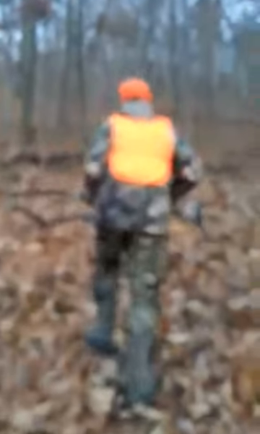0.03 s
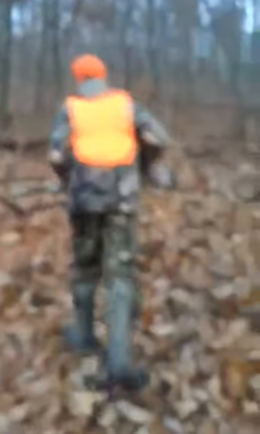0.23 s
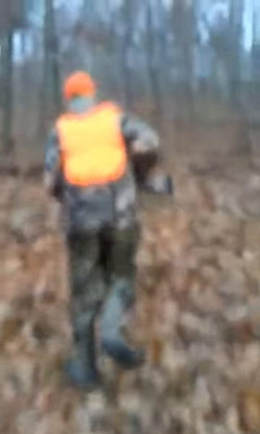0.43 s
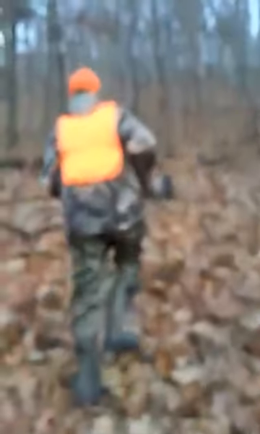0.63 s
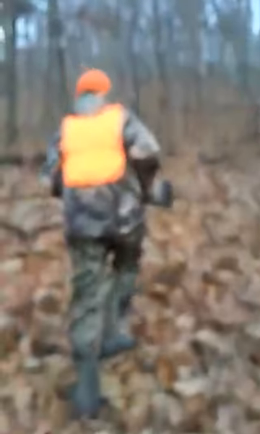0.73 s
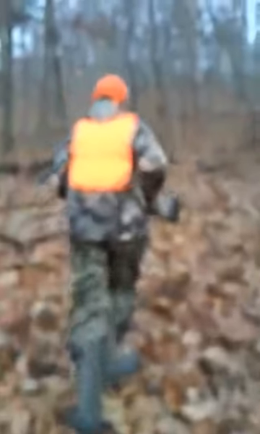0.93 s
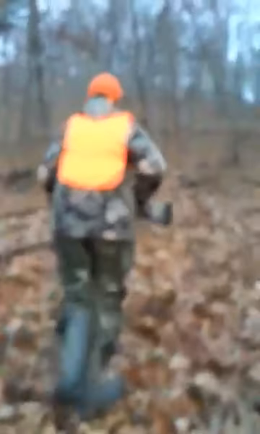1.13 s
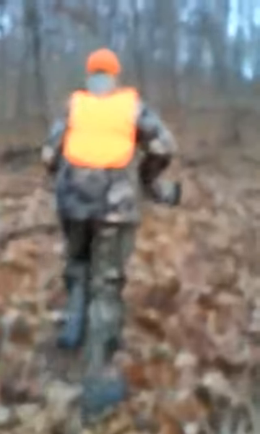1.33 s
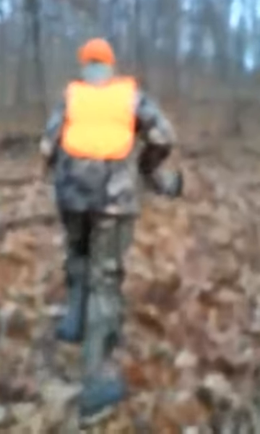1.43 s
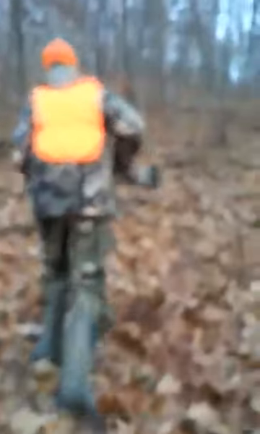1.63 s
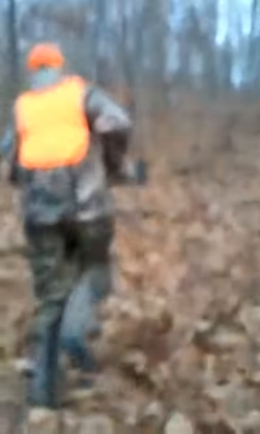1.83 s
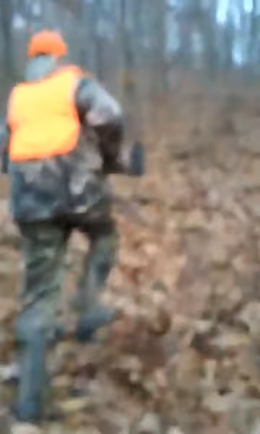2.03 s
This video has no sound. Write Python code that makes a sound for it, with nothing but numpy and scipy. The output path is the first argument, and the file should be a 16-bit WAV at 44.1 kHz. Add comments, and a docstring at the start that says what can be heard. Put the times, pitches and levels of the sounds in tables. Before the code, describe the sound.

Footsteps crunch through dry fallen leaves in the woods, with twigs snapping and light wind buffeting

```python
"""Two walkers climb through dry leaves, one a few steps ahead, one carrying the single microphone.
From the start, crushed litter crackles as damped grains and loose leaves swish as finer, brighter ones, swelling
most near 0.5, 1.2 and 1.8 s; filtered noise gives the wind and the far rustle. Twigs soon snap, as noisy cracks
with damped partials; wind puffs follow as windowed cosines, then soil thumps as damped sines. The wind is
strongest near 1.9 s. Patches of the treble are replaced with noise unrelated left and right."""
import sys
import numpy as np
from scipy import signal
from scipy.fft import rfft, irfft, next_fast_len
from scipy.io import wavfile
from scipy.ndimage import uniform_filter1d, map_coordinates

SR = 44100
rng = np.random.default_rng(int(sys.argv[2]) if len(sys.argv) > 2 else 0)


def dump_mix(stems):
    """Bounce the given channels to the path in sys.argv[1] as a 16-bit WAV at rate SR."""
    frames = np.atleast_2d(stems).T  # one column per channel
    limited = np.clip(frames, -1, 1)  # hard clip at full scale
    pcm = np.round(limited * 32767).astype(np.int16)
    wavfile.write(sys.argv[1], SR, pcm)


def ratio_of_db(decibels):
    """Turn decibels (scalar or array-like) into linear amplitude factors; 0 dB maps to 1."""
    return 10 ** (np.asarray(decibels, float) / 20)


N = 91110

# Weight on the litter, as an envelope before fixed trims and wobble:
# time_s [s], level_db [dB], packed_layer_over_level_db [dB]
CRUNCH_ENVELOPE = [(0.0, -39.5, -7), (0.046, -38.5, -22), (0.076, -48.5, -1), (0.12, -49, -19),
                   (0.2, -52, -12), (0.25, -45, -23), (0.292, -48, -25), (0.306, -35, -10),
                   (0.342, -32, -7), (0.404, -37, -7.5), (0.46, -32.5, -6.5), (0.496, -22.5, -11),
                   (0.51, -19, -10), (0.528, -23.5, -7), (0.568, -21, -15), (0.584, -30.5, -7),
                   (0.614, -27, -11), (0.626, -35, -7), (0.7, -41.5, -3), (0.74, -45.5, 3.5),
                   (0.846, -49.5, -1), (0.868, -43.5, -3), (0.896, -51, 3), (0.935, -47, 0),
                   (0.975, -38.5, -1), (1.0, -40.5, -4), (1.038, -34.5, -7.5), (1.088, -42, -1),
                   (1.104, -26, -2.5), (1.119, -27.5, -2), (1.122, -18.5, -6), (1.162, -15.5, -10.5),
                   (1.186, -20.5, -3.5), (1.195, -24, -12), (1.203, -24, -5), (1.226, -28, -7),
                   (1.26, -23.5, -9), (1.305, -32.5, -4.5), (1.335, -32, -9), (1.399, -39, -6.5),
                   (1.499, -52, 0), (1.505, -45.5, -5.5), (1.615, -44.5, -5), (1.633, -31, -8.5),
                   (1.691, -45.5, -5), (1.717, -39.5, -7), (1.745, -25.5, -18), (1.765, -32, -5),
                   (1.784, -21.5, -11), (1.833, -20, -12), (1.88, -25.5, -12.5), (1.9, -36, 0),
                   (1.922, -30.5, -8), (1.946, -40.5, -6), (1.989, -45, -6.5), (2.066, -48.5, -2.5)]
# Boots sweeping loose leaves, as an envelope before wobble: time_s [s], level_db [dB]
SWISH_ENVELOPE = [(0.0, -37.5), (0.116, -41.5), (0.22, -41.5), (0.292, -38), (0.306, -28.5), (0.35, -22.5),
                  (0.394, -33.5), (0.46, -30), (0.508, -22), (0.688, -37), (0.7, -62), (0.74, -42),
                  (0.846, -44), (0.858, -43), (0.868, -27.5), (0.88, -35), (0.906, -29.5), (0.92, -30.5),
                  (0.976, -24.5), (0.996, -33), (1.088, -35.5), (1.104, -29), (1.119, -27), (1.122, -21.5),
                  (1.238, -30), (1.258, -22.5), (1.305, -27), (1.365, -35.5), (1.421, -39.5), (1.597, -35),
                  (1.615, -27), (1.675, -29), (1.69, -40), (1.698, -29.5), (1.71, -30.5), (1.799, -21.5),
                  (1.883, -28.5), (2.033, -45), (2.049, -40), (2.066, -36)]
# Wind on the microphone, as an envelope before a fixed trim and wobble: time_s [s], level_db [dB]
WIND_ENVELOPE = [(0.0, -56.5), (0.37, -46), (0.42, -56), (0.48, -46), (0.95, -49.5), (0.99, -45),
                 (1.02, -48), (1.18, -31), (1.29, -52.5), (1.6, -35.5), (1.69, -45), (1.74, -37.5),
                 (1.88, -26), (1.95, -35), (2.0, -32), (2.07, -41)]
# Relative spectra of crushed leaves, packed layer, sliding leaves, wind and woods: frequency_hz [Hz], gain_db [dB]
CRUNCH_SPECTRUM = [(530, -40), (900, -13.5), (1980, -4), (3070, -5.5), (4260, -2), (8770, -12),
                   (12400, -12.5), (13300, -20)]
PACKED_SPECTRUM = [(110, -32), (220, -13), (324, -6.5), (498, -7.5), (1300, -4.5), (1690, -6), (2860, -120)]
SWISH_SPECTRUM = [(300, -17), (2350, -9), (3300, -24), (4600, -22), (5300, -5.5), (8850, -5), (10600, -9),
                  (11700, -4), (13300, -15)]
WIND_SPECTRUM = [(8.8, -41), (15, 2.5), (54, 0.5), (76, 0.5), (117, -3), (252, -17.5), (300, -39),
                 (390, -65), (660, -120)]
WOODS_SPECTRUM = [(59, -39), (100, -17), (196, -19), (340, 6), (1830, -20), (2810, -29), (13300, 2)]
# Single puffs of wind hitting the microphone: start_s [s], peak_db [dB], pitch_hz [Hz]
WIND_PUFFS = [(0.354, -39, 72), (0.984, -32, 55.5), (1.187, -30.5, 51.1), (1.467, -33.5, 67),
              (1.574, -31.5, 53.8), (1.737, -30.5, 60), (1.814, -29, 55.4), (1.86, -44, 61.5),
              (1.928, -18, 81.5), (1.963, -20.5, 67), (2.001, -29.5, 45)]
# Twigs and stiff leaves breaking:
# start_s [s], peak_db [dB], pitch_hz [Hz], decay_to_minus_60_db_s [s], ringing_over_crack_db [dB]
TWIG_SNAPS = [(0.04, -19, 4330, 0.021, 7), (0.134, -20.5, 4560, 0.015, 10), (0.215, -21, 1884, 0.019, 15),
              (0.427, -9.5, 8720, 0.011, -17), (0.508, -1.5, 2220, 0.013, -14), (0.556, -12, 975, 0.01, 17),
              (0.565, -20, 4360, 0.0099, -6), (0.711, -17, 4020, 0.061, -7.5), (0.721, -20, 4400, 0.026, 0),
              (1.028, -15, 2200, 0.0065, -2), (1.1221, -14.5, 1470, 0.012, -12),
              (1.138, -10, 4400, 0.025, 6), (1.159, -4, 2400, 0.016, -15), (1.198, -12, 1080, 0.021, 4),
              (1.254, -7, 4240, 0.011, 9), (1.278, -11.5, 1410, 0.0086, 11), (1.316, -2, 3520, 0.011, -20),
              (1.323, -6.5, 4370, 0.023, -8), (1.346, -21, 5100, 0.017, -9),
              (1.377, -11.5, 7160, 0.011, -4), (1.386, -14, 1605, 0.012, -1.5),
              (1.443, -22.5, 6900, 0.0076, 10), (1.574, -18.5, 7230, 0.007, 0),
              (1.697, -14.5, 7700, 0.023, -10)]
# Partials of a ringing twig, before random spread: pitch_ratio [times the pitch], level_db [dB]
TWIG_PARTIALS = [(1, 1), (1.48, -3.5), (1.95, -10.5), (3.03, -1.5)]
# Soles meeting the soil: start_s [s], level_before_damping_db [dB], pitch_hz [Hz]
SOIL_THUMPS = [(0.466, -22.5, 385), (0.476, -23.5, 194), (0.509, -6.5, 805), (0.519, -24.5, 200),
               (1.102, -13, 444), (1.202, -14.5, 336), (1.254, -18.5, 305), (1.47, -31, 230),
               (1.771, -22.5, 354), (1.935, -21.5, 165)]

WOODS_DB = -45
PUFF_CYCLES = 2  # length of a puff
SNAP_BUILD_S, SNAP_SPIKE = .0005, 6  # build-up time; instant of breaking, over the noise of the crack
THUMP_CYCLES = 7.2  # until 60 dB down
TOP_HZ = 13300  # band limit
PATCH_FROM_HZ, PATCH_BAND_HZ = 4400, 700  # lowest frequency and band width of the noise patches
PATCH_MOMENTS, PATCH_BANDS = .9, .66  # share of moments, and of bands within them
PATCH_JUMP_DB = 5  # a rise in power beyond this keeps the moment free of patches


def unit(x):
    """Normalization: the signal scaled to rms 1."""
    return x / np.sqrt(np.mean(x ** 2) + 1e-20)


def curve(rows, column=1):
    """Linear interpolation: one column against the time column, one value per sample."""
    table = np.transpose(rows)
    return np.interp(np.arange(N) / SR, table[0], table[column])


def wobble(rate_hz):
    """Random modulation: a smooth curve through Gaussian knots, rate_hz of them a second."""
    knots = rng.standard_normal(N // 50)
    return map_coordinates(knots, [np.arange(N) * rate_hz / SR])


def coloured(x, points):
    """Linear filtering: x through a spectrum of (Hz, dB) points on a log frequency axis, rms 1."""
    size = next_fast_len(N + 8192)
    hz, db = np.transpose(points)
    bins_hz = np.fft.rfftfreq(size, 1 / SR)
    gain = ratio_of_db(np.interp(np.log(bins_hz + 1), np.log(hz + 1), db))
    return unit(irfft(rfft(x, size) * gain, size)[:N])


def place(starts_s, rows):
    """Superposition: short sounds summed at their start times."""
    at = np.round(starts_s * SR).astype(int)[:, None] + np.arange(rows.shape[1])
    return np.bincount(at.ravel(), rows.ravel(), N + SR)[:N]


def crackle(count, low_hz, high_hz, cycles, spread_db, hiss):
    """Impulsive fracture: damped grains at random times, mostly small and a few large, over a share of hiss."""
    when, pitch, rarity = rng.random((3, count, 1))
    t = np.arange(int(3 * SR / low_hz)) / SR
    hz = low_hz + (high_hz - low_hz) * pitch
    size = ratio_of_db(-spread_db * np.log(rarity + 2e-3))
    # cycles: until the grain falls to 1/e
    rows = size * np.sqrt(hz) * np.exp(-t * hz / cycles) * np.sin(2 * np.pi * hz * t)
    grains = place(when[:, 0] * N / SR, rows)
    grains = unit(grains - grains.mean())
    # hiss is a share of the power
    return np.sqrt(1 - hiss) * grains + np.sqrt(hiss) * rng.standard_normal(N)


def crunch():
    """Brittle crushing: leaves crackle under the soles, the packed layer below in coarser, duller grains."""
    level_db = curve(CRUNCH_ENVELOPE) + 1.22 * wobble(70.95)
    leaves = crackle(count=14000, low_hz=600, high_hz=14000, cycles=.8, spread_db=2.5, hiss=.6)
    packed = crackle(count=1500, low_hz=130, high_hz=1500, cycles=.8, spread_db=2.2, hiss=.6)
    leaves_db = 1.15 * wobble(300) + 2.5
    packed_db = curve(CRUNCH_ENVELOPE, column=2) + 0.85 * wobble(47.3)
    upper = ratio_of_db(leaves_db) * coloured(leaves, CRUNCH_SPECTRUM)
    lower = ratio_of_db(packed_db) * coloured(packed, PACKED_SPECTRUM)
    return ratio_of_db(level_db) * (upper + lower)


def swish():
    """Sliding friction: loose leaves pass over each other in finer, brighter grains."""
    grains = crackle(count=14000, low_hz=3440, high_hz=13950, cycles=1.13, spread_db=2.5, hiss=0.43)
    level_db = curve(SWISH_ENVELOPE) + 1.68 * wobble(90)
    return ratio_of_db(level_db) * coloured(grains, SWISH_SPECTRUM)


def wind():
    """Pressure fluctuation: lumpy low noise buffets the microphone, with single rounded puffs."""
    start_s, peak_db, hz = np.transpose(WIND_PUFFS)[:, :, None]
    phase = np.minimum(np.arange(4000) / SR * hz / PUFF_CYCLES, 1)  # 0 to 1 through the puff
    swell = np.sin(np.pi * phase) ** 2
    wave = np.cos(2 * np.pi * PUFF_CYCLES * (phase - .5))
    puffs = place(start_s[:, 0], ratio_of_db(peak_db) * swell * wave)
    level_db = curve(WIND_ENVELOPE) + 1.15 * wobble(22.14) - 3.5
    return puffs + ratio_of_db(level_db) * coloured(rng.standard_normal(N), WIND_SPECTRUM)


def woods():
    """Diffuse background: far rustle and air among the trees as nearly steady filtered noise."""
    level_db = WOODS_DB + 0.39 * wobble(17.0)
    return ratio_of_db(level_db) * coloured(rng.standard_normal(N), WOODS_SPECTRUM)


def snaps():
    """Sudden release of strain: a noisy crack, broad around its pitch, and quickly damped partials."""
    start_s, peak_db, hz, t60_s, ring_db = np.transpose(TWIG_SNAPS)[:, :, None]
    t = np.arange(1024) / SR
    ring = 0
    for ratio, level_db in TWIG_PARTIALS:
        spread_db = 2 * rng.standard_normal(hz.shape)
        partial_hz = np.minimum(ratio * hz, 12500)
        ring = ring + ratio_of_db(level_db + spread_db) * np.sin(2 * np.pi * partial_hz * t)
    spike = np.round(t * SR) == round(SNAP_BUILD_S * SR)
    jolt = rng.standard_normal((len(hz), len(t))) - SNAP_SPIKE * spike
    relative = np.fft.rfftfreq(len(t), 1 / SR) / hz
    crack = irfft(rfft(jolt) * relative / (1 + relative ** 2.63), len(t))
    crack = crack / crack.std(1, keepdims=True)
    shape = ratio_of_db(-60 * t / t60_s) * (1 - np.exp(-(t / SNAP_BUILD_S) ** 2))
    rows = shape * (crack + ratio_of_db(ring_db) * ring)
    rows = rows / np.abs(rows).max(1, keepdims=True)
    return place(start_s[:, 0], ratio_of_db(peak_db) * rows)


def thumps():
    """Heavily damped resonance: a dull, compact knock from the ground lasts a few cycles."""
    start_s, level_db, hz = np.transpose(SOIL_THUMPS)[:, :, None]
    t = np.arange(3000) / SR
    decay = ratio_of_db(level_db - 60 * t * hz / THUMP_CYCLES)
    attack = 1 - np.exp(-t / 0.00047)
    return place(start_s[:, 0], decay * attack * np.sin(2 * np.pi * hz * t))


def scene():
    """Superposition at one microphone, fed to both channels."""
    mono = crunch() + swish() + wind() + woods() + snaps() + thumps()
    return np.tile(mono, (2, 1))


def substitute_noise(x):
    """Noise substitution: random treble patches become noise unrelated left and right; sharp attacks are kept."""
    hz, t, spectrum = signal.stft(x, SR, nperseg=2048)
    band = (hz // PATCH_BAND_HZ).astype(int)
    power = np.array([np.mean(np.abs(spectrum[0, band == b]) ** 2, 0) for b in range(band[-1] + 1)])
    # power of the slope against its average a little earlier
    short = uniform_filter1d(np.diff(x[0]) ** 2, size=256) + 1e-12
    rise = short / np.roll(uniform_filter1d(short, size=768), 512)
    centres = (np.minimum(t, N / SR) * SR).astype(int)
    steepest = np.array([rise[max(0, c - 700):c + 700].max() for c in centres])
    calm = steepest < ratio_of_db(2 * PATCH_JUMP_DB)  # doubled, as rise is a power ratio
    patch = (rng.random(power.shape) < PATCH_BANDS) * (rng.random(len(t)) < PATCH_MOMENTS)
    patch = np.repeat(patch, 2, 1)[:, :len(t)] * calm  # each draw lasts two frames
    treble = (hz > PATCH_FROM_HZ) * (hz < TOP_HZ)
    chosen = patch[band] * treble[:, None]
    noise = signal.stft(rng.standard_normal(x.shape), SR, nperseg=2048)[2]
    noise = noise * np.sqrt(power[band] / np.mean(np.abs(noise) ** 2))  # the strength of its band
    return signal.istft(np.where(chosen, noise, spectrum), SR, nperseg=2048)[1][:, :N]


def low_pass(x):
    """Removes everything above the highest recorded frequency."""
    return signal.sosfilt(signal.butter(12, 14070, fs=SR, output="sos"), x)


def record(dry):
    """Saturation and band limitation: a soft ceiling, a sharp top edge, then noise in patches of the treble."""
    held = dry / (1 + np.abs(dry / .95) ** 6) ** (1 / 6)
    kept = irfft(rfft(held) * (np.fft.rfftfreq(N, 1 / SR) < TOP_HZ), N)
    mix = substitute_noise(kept)
    return low_pass(mix)


dry = scene()
out = record(dry)
dump_mix(out)
```